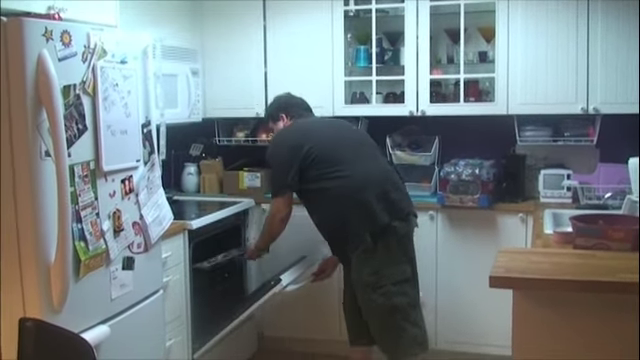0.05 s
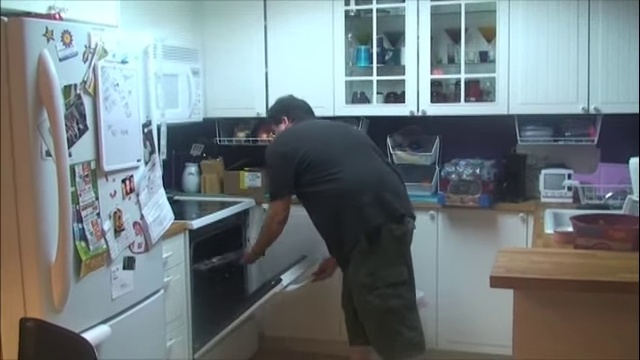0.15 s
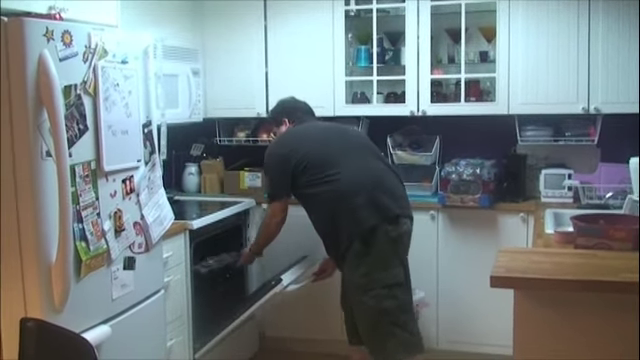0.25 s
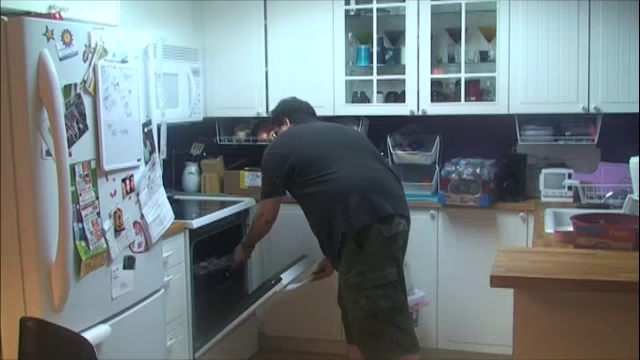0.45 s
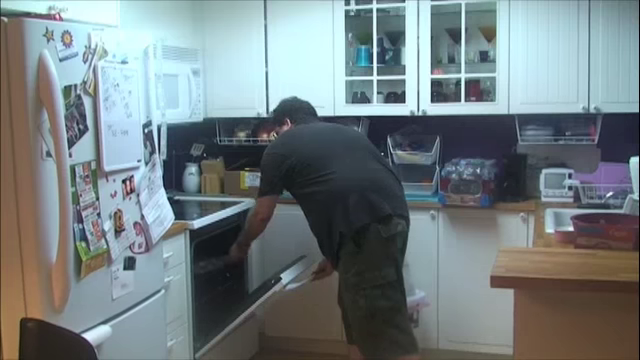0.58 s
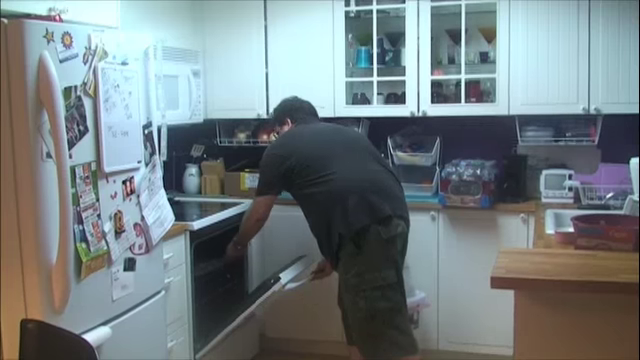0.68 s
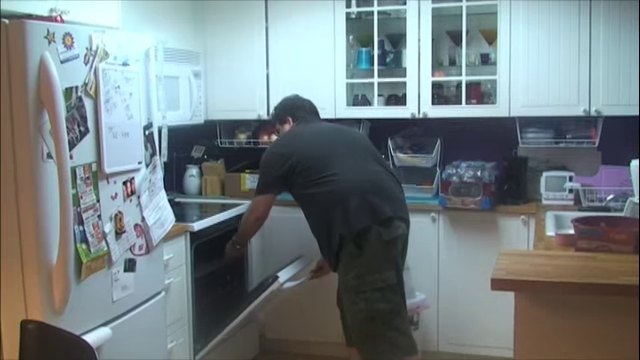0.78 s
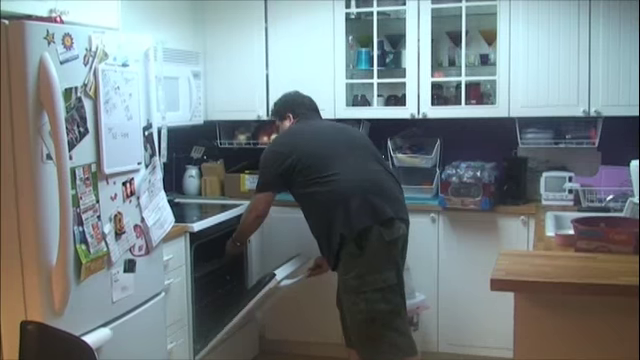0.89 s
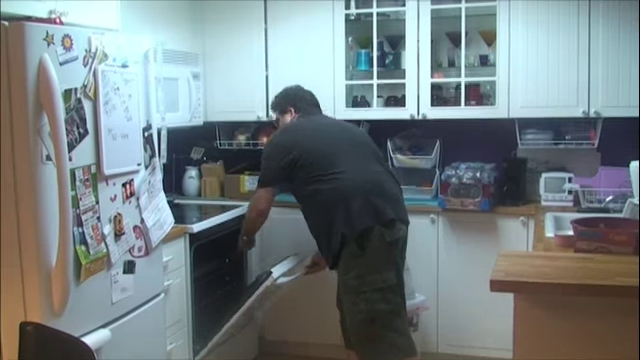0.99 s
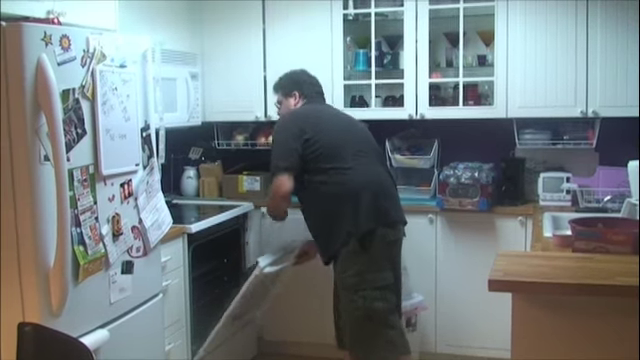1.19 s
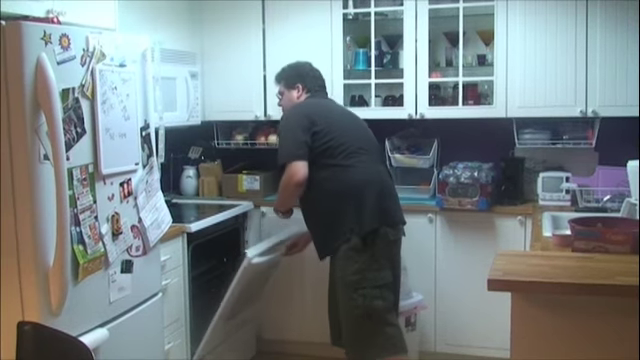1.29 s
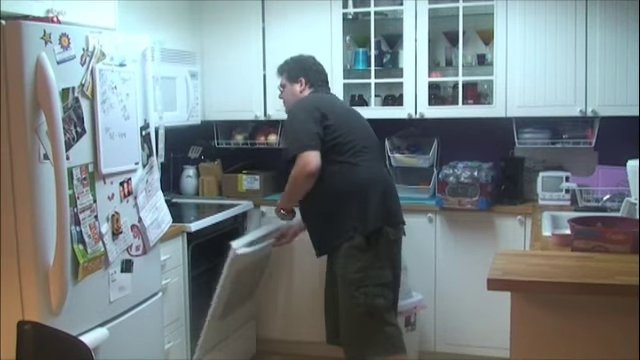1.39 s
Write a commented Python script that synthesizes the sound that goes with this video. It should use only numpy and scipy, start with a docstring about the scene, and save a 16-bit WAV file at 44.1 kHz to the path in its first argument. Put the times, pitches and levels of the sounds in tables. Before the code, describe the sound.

A metal baking tin clatters onto a wire oven rack and scrapes inward with brief squeals. The ringing fades and the door hinge sings faintly, heard a few metres away in a kitchen with a low appliance hum.

```python
"""A baking tin goes into the oven

A few metres away in a hard-walled kitchen, a metal tin is set on a wire oven rack and pushed in.
It clatters and scrapes over the wires, now and then squealing on one of its own notes; tin, rack
and room ring on. The door's hinge sings faintly as the door starts to close with a puff of air.
Behind it all are a thin high whine, a soft hiss and the low hum of appliances."""
import sys
import numpy as np
from scipy import signal
from scipy.fft import rfft, irfft
from scipy.io import wavfile

SR = 44100
rng = np.random.default_rng(int(sys.argv[2]) if len(sys.argv) > 2 else 0)


def persist_wave(psi):
    """Save psi, clipped to +-1, as 16-bit WAV."""
    counts = np.round(np.clip(psi, -1, 1) * 32767).astype(np.int16)
    wavfile.write(sys.argv[1], SR, np.atleast_2d(counts).T)


N = 63945
T = np.arange(N) / SR

# The tin knocks on the rack; thump, rings and boost are relative to the knock's level.
# (time [s], level [dB], brightness [Hz], thump [dB], tin ring [dB], wire ring [dB],
#  boosted pitch [Hz], boost [dB])
KNOCKS = [(0.2062, -30.5, 15700, -22, -20, 13, 6000, 6), (0.219, -26.5, 7800, 3, 6.5, 4, 5000, 7.5),
          (0.262, -24.5, 4900, -22, -14, 5, 1870, 1), (0.296, -29.5, 3500, 5.5, 7, -6, 560, 0),
          (0.327, -23.5, 4000, 2.5, -1.5, -14, 2270, 7.5), (0.396, -39, 1200, -15, -6, 10.5, 1270, 17.5),
          (0.4455, -21.5, 14000, -22, 4.5, 6.5, 7100, 4.5), (0.451, -18, 9100, 2.5, -2, 6, 1170, 5.5),
          (0.482, -18, 6130, -3.5, 5.5, 7, 2260, 0), (0.516, -23.5, 5500, 10, -1, 8, 4570, 10),
          (0.547, -25, 5500, 6.5, -2, -4, 5130, 8.5), (0.590, -22.5, 16000, 8, 0.5, -8, 650, 1.5),
          (0.611, -27, 3030, 1, 3, 1, 1270, 12), (0.624, -20.5, 9100, -4, 1, 2, 2130, 5),
          (0.680, -34, 2490, 1, 16.5, 22, 3450, 4), (0.825, -26, 2400, -1.5, 8, -2, 1930, 7.5),
          (0.836, -29.5, 11900, 11, 8, -16, 1730, 9), (0.904, -27, 6950, -23, 3, -8, 1670, 12),
          (0.920, -25, 4050, -2, 6, -18, 3720, 4.5), (0.962, -21.5, 6540, -4.5, 0.5, -6, 1040, 6.5),
          (0.978, -26, 4550, 9.5, 5, -15, 3870, 9.5), (0.996, -22.5, 2550, -15, 3, 6, 1980, -1)]
# The tin slides over the wires: (start [s], length [s], level [dB], brightness [Hz])
SLIDES = [(0.225, 0.17, -18.5, 3150), (0.46, 0.22, -19, 3560), (0.86, 0.2, -24, 2100)]
# The tin sticks and slips on one note: (start [s], length [s], pitch [Hz], level [dB])
SQUEALS = [(0.610, 0.03, 1768, -18), (0.672, 0.04, 1787, -24), (0.600, 0.055, 383, -23.5),
           (0.67, 0.045, 384, -28), (0.645, 0.047, 3415, -28), (0.625, 0.02, 8170, -37),
           (0.832, 0.02, 8450, -42), (0.902, 0.026, 1412, -19), (0.938, 0.016, 1765, -21),
           (0.988, 0.012, 1795, -21)]
# The tin's own notes, fading 60 dB in their ring time: (pitch [Hz], level [dB], ring time [s])
TIN_NOTES = [(252.8, -24, 0.86), (289.5, -20, 0.36), (382.6, -16, 0.51), (553.8, -19.5, 1),
             (616, -19, 0.57), (768.5, -18, .45), (1072, -15.5, 0.33), (1284, -23.5, 0.39),
             (1421, -22, 0.58), (1786, -16, 0.79), (2141, -11.5, 0.26), (2385, -12, 0.34),
             (2510, -16, 0.43), (3443, -20, .36), (4010, -23, 0.61), (5690, -16.5, 0.31), (6550, -18, 0.48),
             (11600, -13, 0.25), (13400, -23, 0.22)]
# The rack wires' own notes: (pitch [Hz], level [dB], ring time [s])
WIRE_NOTES = [(1195, -14, 0.23), (1291, -10, 0.13), (1810, -25, .35), (2300, -20, 0.19), (2833, -32, 0.18),
              (3380, -21, 0.73), (4360, -13, 0.2), (4820, -15, 0.31), (5260, -28, 0.22), (6000, -30.5, 0.9),
              (6860, -14, 0.31), (7090, -16, 0.18), (7390, -10.5, 0.17), (10500, -15.5, 0.17),
              (11100, -10, 0.19), (11450, -16, 0.12)]
# Sheet metal, oven and kitchen ringing together: (pitch [Hz], level [dB per Hz], ring time [s])
CLANG = [(45, -24, 0.74), (115, -15.5, 0.88), (179, -15.5, 0.92), (248, -4.5, 0.8), (594, -3, 0.73),
         (840, -8.5, 1), (1180, -4.5, 0.7), (2040, -4, 0.71), (2780, -6.5, 0.54), (4170, -6, 0.51),
         (6900, -9.5, 0.47), (9200, -11, 0.41), (11350, -8, 0.41), (12900, -15.5, 0.28),
         (15500, -19.5, 0.42)]
# How the ringing reaches the two ears: (pitch [Hz], left minus right [dB], likeness [0 to 1])
STEREO = [(60, -8.5, .85), (130, -8, .94), (350, -4.5, .96), (700, -2.7, .94), (1400, -2, .91),
          (2800, -2.4, .84), (4500, -4.5, .7), (7000, -7, .55), (9000, -2, .4), (11000, 1.5, .5),
          (12500, -12, .3), (15500, -6, .45)]
# The hinge sings: (start [s], length [s], pitch [Hz], level [dB])
HINGE_NOTES = [(1.10, 0.12, 568, -44), (1.27, 0.16, 592, -51), (1.09, 0.07, 706, -41),
               (1.24, 0.21, 706, -48)]
# The door rubs as it swings: (start [s], length [s], level [dB], brightness [Hz])
DOOR_RUBS = [(1.17, 0.16, -54, 243), (1.27, 0.13, -47, 4030)]
# The whine fades in, then eases off: (time [s], level [dB])
WHINE_LEVELS = [(0.25, -100), (0.4, -66), (1.2, -62), (1.45, -67)]
# The room's steady rumble and hiss: (pitch [Hz], level [dB per Hz])
ROOM_NOISE = [(15, -43), (25, -1), (86, -27.5), (122, -6), (152, -17), (246, -7), (567, -21), (945, -17),
              (3340, -31.5), (11800, -37), (15500, -36.5)]
# The appliances hum: (pitch [Hz], level [dB])
HUM_NOTES = [(119, -59), (274.5, -60)]

BUILD_UP_S = 0.0067  # ringing takes a moment to grow
ROOM_PAN_DB = -4.5  # left minus right


def knocks(spots):
    """Each knock rings tin, wires and oven from one of a few spots, at its own loudness and brightness."""
    out = 0
    for k, (start, db, bright_hz, thump_db, tin_db, wire_db, boost_hz, boost_db) in enumerate(KNOCKS):
        body = spots[k % len(spots)]
        body = body + (from_db(thump_db) - 1) * low_pass(body, hz=460)
        body = body + from_db(tin_db) * ring(TIN_NOTES) + from_db(wire_db) * ring(WIRE_NOTES)
        # Where the tin is hit brings out a broad range of pitches.
        peak = signal.iirpeak(boost_hz, Q=1 / 0.48, fs=SR)
        body = body + (from_db(boost_db) - 1) * signal.lfilter(*peak, body)
        out = out + from_db(db) * delayed(low_pass(body, bright_hz), start)
    return out


def ring(notes, count=4, detune=0.00918, scatter_db=1.0):
    """Struck metal rings on its own notes; each is a few close tones that throb against each other."""
    out = 0
    for hz, db, ring_s in notes:
        pitches = hz * (1 + detune * rng.uniform(-1.043, 1, (2, count, 1)))
        phases = rng.uniform(0, 2 * np.pi, (2, count, 1))
        waves = np.sin(2 * np.pi * pitches * T + phases).sum(1) * np.sqrt(2 / count)
        gain = from_db(db + scatter_db * rng.normal()) * pan(at_hz(STEREO, hz))
        out = out + gain * stereo_pair(*waves, at_hz(STEREO, hz, column=2)) * fade(T, ring_s)
    return out * (1 - np.exp(-T / BUILD_UP_S))


def clang():
    """One hit sets off a crack and a wash of ringing; each band of pitch dies at its own rate."""
    out, power = 0, 0
    for hz, noises in noise_bands():
        band = from_db(at_hz(CLANG, hz)) * stereo_pair(*noises, at_hz(STEREO, hz, column=2))
        power += np.mean(band ** 2)
        out = out + band * pan(at_hz(STEREO, hz)) * fade(T, at_hz(CLANG, hz, column=2))
    build_up = 1 - np.exp(-T / BUILD_UP_S)
    crack = from_db(1.5) * np.exp(-T / 0.01)
    return out / np.sqrt(power) * (build_up + crack)


def rubbing(strokes, spot, slips_per_s=300, spread_db=2):
    """A scrape is many tiny, uneven slips, each setting off the same clang."""
    out = 0
    for start, length, db, bright_hz in strokes:
        sizes = from_db(spread_db * np.minimum(rng.exponential(1, N), 3)) * rng.choice([-1, 1], N)
        slips = unit_power(sizes * (rng.random(N) < slips_per_s / SR))
        moving = (T > start) & (T < start + length)
        out = out + from_db(db) * low_pass(slips * moving, bright_hz)
    response = spot / np.sqrt(np.sum(spot ** 2) / 2)
    return signal.fftconvolve(out[None], response, axes=1)[:, :N]


def squealing(notes, ring_s, wander, flutter_db):
    """Friction makes one wavering note swell while the rubbing lasts; then the note rings out."""
    out = 0
    for start, length, hz, db in notes:
        swell = np.sqrt(np.clip((T - start) / length, 0, 1))
        tail = fade(np.maximum(T - start - length, 0), ring_s)
        pitch = hz * (1 + wander * drift(55.4))
        tone = np.sqrt(2) * np.sin(2 * np.pi * np.cumsum(pitch) / SR)
        gain = from_db(db + flutter_db * drift(33))
        out = out + pan(at_hz(STEREO, hz)) * tone * swell * tail * gain
    return out


def door_puff(peak_s=1.21, width_s=0.039):
    """The swinging door pushes a short, deep rumble of air."""
    swell = np.exp(-((T - peak_s) / width_s) ** 2)
    return pan(ROOM_PAN_DB) * from_db(-51) * drift(45) * swell


def whine(hz=10660, flutter_hz=100):
    """A faint, thin high tone that flutters."""
    phase = 2 * np.pi * hz * T
    tone = drift(flutter_hz) * np.sin(phase) + drift(flutter_hz) * np.cos(phase)
    return from_db(np.interp(T, *np.transpose(WHINE_LEVELS))) * tone


def room_tone():
    """Soft, steady hiss and rumble with the hum of appliances."""
    air = sum(from_db(at_hz(ROOM_NOISE, hz)) * stereo_pair(*noises, likeness=0.4)
              for hz, noises in noise_bands())
    hum = sum(from_db(db) * np.sqrt(2) * np.sin(2 * np.pi * hz * T + drift(1.15) / 2)
              for hz, db in HUM_NOTES)
    return pan(ROOM_PAN_DB) * (from_db(-46.5) * unit_power(air) + hum)


def from_db(db):
    """Turn decibels into a number to multiply by."""
    return 10 ** (np.asarray(db) / 20)


def unit_power(x):
    """Scale a sound so its average power is 1."""
    return x / np.sqrt(np.mean(x ** 2) + 1e-20)


def fade(t, ring_s):
    """Die away by 60 dB every ring_s seconds."""
    return np.exp(-np.log(1000) * t / ring_s)


def at_hz(table, hz, column=1):
    """Look up a pitch in a table, blending between rows."""
    table = np.array(table)
    return np.interp(np.log(hz), np.log(table[:, 0]), table[:, column])


def pan(db):
    """Left and right gains; positive dB leans left."""
    return from_db(np.array([[db], [-db]]) / 2)


def low_pass(x, hz, order=1):
    """Gently dull everything above hz."""
    return signal.sosfilt(signal.butter(order, hz, fs=SR, output="sos"), x)


def drift(hz):
    """A random wobble of size about 1; higher hz wobbles faster."""
    return unit_power(low_pass(rng.standard_normal(2 * N), hz, order=2)[N:])


def delayed(x, start):
    """Begin a stereo sound at start seconds."""
    return np.pad(x, ((0, 0), (int(start * SR), 0)))[:, :N]


def stereo_pair(mid, side, likeness):
    """Mix two unrelated sounds into left and right; likeness 1 makes both the same."""
    opposite = side * np.array([[1], [-1]])
    return (np.sqrt(1 + likeness) * mid + np.sqrt(1 - likeness) * opposite) / np.sqrt(2)


def noise_bands(count=30):
    """Slice white noise into bands, giving each one's centre pitch and two unrelated noises."""
    edges = np.geomspace(220, 17200, count + 1) - 200
    white = rfft(rng.standard_normal((2, 2 * SR)))
    hz = np.arange(SR + 1) / 2
    for low, high in zip(edges, edges[1:]):
        inside = (hz >= low) & (hz < high)
        yield np.sqrt(low * high), irfft(white * inside)[:, :N]


def scene():
    """Tin and oven door, a little to the right, over the background of the kitchen."""
    spots = [clang() for _ in range(5)]
    tin = knocks(spots) + rubbing(SLIDES, spots[0])
    tin += squealing(SQUEALS, ring_s=0.13, wander=0.011, flutter_db=2)
    door = rubbing(DOOR_RUBS, spots[1])
    door += squealing(HINGE_NOTES, ring_s=0.42, wander=0.012, flutter_db=4)
    left, right = tin + door
    # The sound reaches the left ear a tiny bit later.
    hz, lag_s = np.arange(SR + 1) / 2, 17e-6
    left = irfft(rfft(left, 2 * SR) * np.exp(-2j * np.pi * hz * lag_s))[:N]
    return np.array([left, right]) + door_puff() + whine() + room_tone()


def record(dry):
    """Clip peaks at full scale and cut the very highest treble."""
    treble_cut = signal.cheby2(16, 70, 16500, fs=SR, output="sos")
    return signal.sosfilt(treble_cut, np.clip(dry, -1, 1))


dry = scene()
out = record(dry)
persist_wave(out)
```